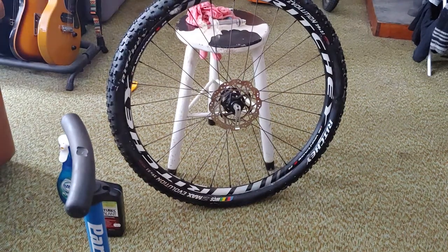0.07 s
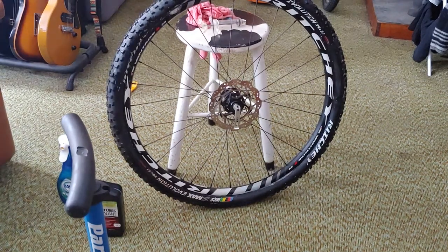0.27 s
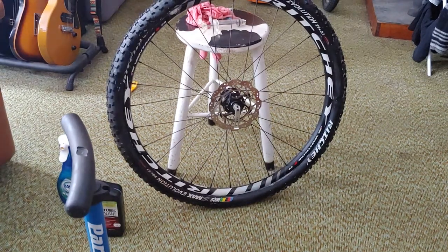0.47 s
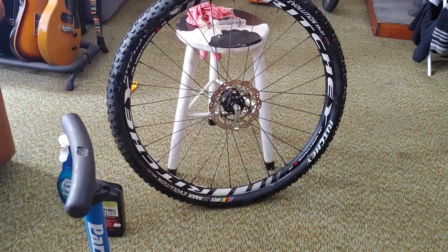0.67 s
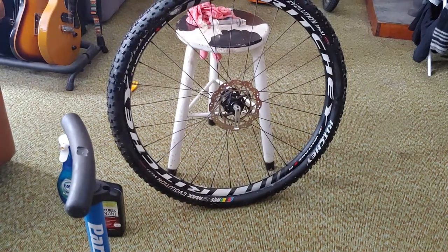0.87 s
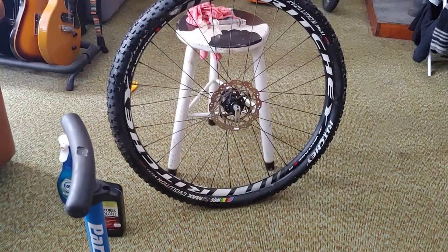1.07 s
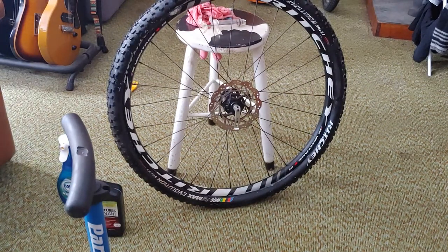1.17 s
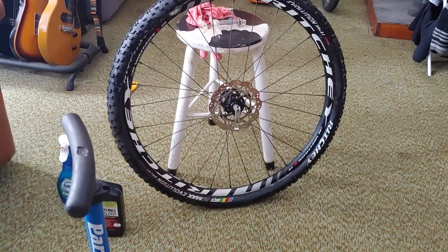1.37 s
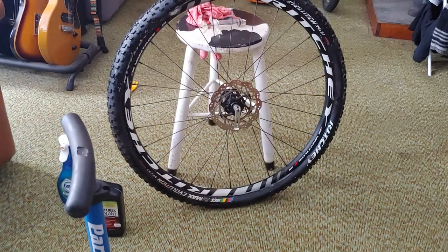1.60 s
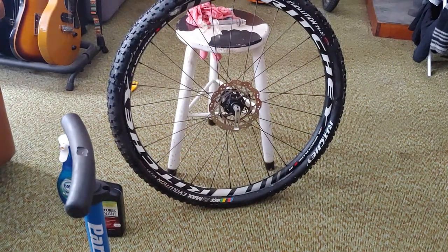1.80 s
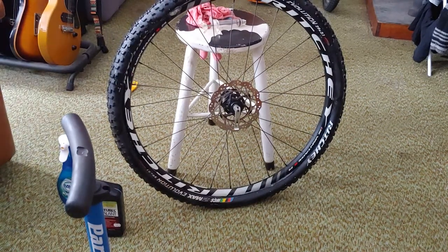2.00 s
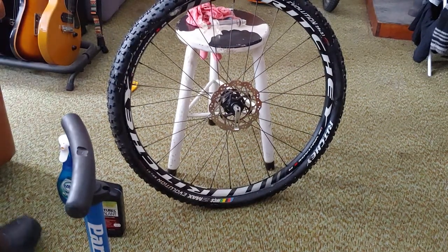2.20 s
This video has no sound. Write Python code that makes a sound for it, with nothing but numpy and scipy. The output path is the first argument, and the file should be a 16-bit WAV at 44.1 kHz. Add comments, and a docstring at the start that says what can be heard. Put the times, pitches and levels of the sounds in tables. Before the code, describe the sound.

Air hisses from a bicycle tyre and fades, with a sharp pop and a thud.

```python
"""From the start, air hisses out of a bicycle tyre in a small carpeted room, over a low hum and faint noise.
At 0.2 s the tyre gives a sharp pop, then a scuff of rubber and a duller thud at 0.4 s, probably
its bead (the stiff edge) leaving the rim. The hiss fades as the pressure drops, and a thin whistle
lingers. A soft knock follows at 1.7 s. Two microphones hear it all."""
import sys
import numpy as np
from scipy import signal
from scipy.fft import rfft, irfft
from scipy.io import wavfile
from scipy.ndimage import map_coordinates

SR = 44100
rng = np.random.default_rng(int(sys.argv[2]) if len(sys.argv) > 2 else 0)


def store_wav(level_fs):
    """Save 16-bit WAV to argv[1]."""
    pcm = np.round(np.clip(np.atleast_2d(level_fs), -1, 1) * 32767)
    wavfile.write(sys.argv[1], SR, pcm.T.astype(np.int16))


N = 99225

# Tone colour of the broad hiss and of the first low rush of air: f/Hz, relative level/dB
HISS_COLOUR = [(200, -12.5), (600, -4.5), (1500, -10), (2000, -4), (2500, -9), (3500, 1.5), (5000, -1.5),
               (6100, -4), (7500, 1), (8100, -6.5), (8650, -50), (9700, -7), (11000, -7), (12600, -17.5),
               (14000, -8), (14900, -20)]
RUSH_COLOUR = [(100, -5), (230, -2), (400, 0.5), (680, 0.5), (1200, -4.5), (2000, -12), (4000, -32)]
# Pitches at which the jet of air rings: f/Hz, width/Hz, relative level/dB
LOWER_PEAKS = [(3655, 290, -0.5), (3900, 160, -2), (4040, 120, -0.5), (4230, 190, -2.5), (4440, 110, -3.5)]
UPPER_PEAKS = [(6530, 90, -12), (6816, 82, 2.5), (6890, 100, 2), (7082, 140, -1.5), (7150, 94, -9.5),
               (7480, 270, -11.5)]
WHISTLE_PEAK = [(4051, 70, 0)]
# Fading as the tyre empties: t/s, hiss level/dB, lower peaks level/dB, upper peaks level/dB
AIR_LEVELS = [(0, -43.5, -47.5, -42.5), (.2, -46, -48.5, -43), (.5, -51.5, -51.5, -47.5),
              (.78, -54.5, -50, -51), (1.15, -58, -56.5, -52), (1.42, -62, -58, -55.5),
              (1.56, -63, -63.5, -58), (2.0, -69.5, -67, -64), (2.25, -70.5, -70.5, -66.5)]

def escaping_air():
    """A jet of air hisses and half whistles near 4 and 7 kHz; its low rush dies first."""
    t = clock()
    times, *levels = np.array(AIR_LEVELS).T
    hiss_gain, lower_gain, upper_gain = (undb(np.interp(t, times, db)) for db in levels)
    rush_db = -46.5 - 47 * np.maximum(t - 0.25, 0)  # holds for 0.25 s, then falls 47 dB a second
    rush = undb(rush_db) * noise(curve(RUSH_COLOUR))
    whistle = undb(-55 - 6.5 * t) * resonances(WHISTLE_PEAK)
    hiss = hiss_gain * noise(curve(HISS_COLOUR))
    ringing = lower_gain * resonances(LOWER_PEAKS) + upper_gain * resonances(UPPER_PEAKS)
    return hiss + ringing + whistle + rush


def resonances(peaks, drift=0.0022, drift_hz=7.14, flutter_db=0.9, flutter_hz=11):
    """Swirling air rings in narrow bands, which waver in pitch and loudness."""
    power = sum(undb(db) ** 2 / (1 + (2 * (bins() - hz) / width) ** 2) ** 2 for hz, width, db in peaks)
    position = np.arange(N) + np.cumsum(drift * wobble(drift_hz))  # uneven speed bends the pitch
    steady = noise(10 * np.log10(power))
    wavering = np.array([map_coordinates(side, [position], order=5, mode="mirror") for side in steady])
    return wavering * undb(flutter_db * wobble(flutter_hz))


# Notes of the tyre and rim after the pop: f/Hz, level/dB, time to fade by 60 dB/s
POP_NOTES = [(109, -24, 0.21), (189, -13.5, 0.13), (275.8, -21, 0.22), (385.2, -10, 0.12), (456, -4, 0.054),
             (519.6, -17.5, 0.216), (577, -21.5, 0.2), (652, -18.5, 0.066), (994, -20.5, 0.12),
             (1083, -18.5, 0.071), (1265, -21.5, .07), (1620, -30, 0.068), (2080, -29, 0.035)]
# Tone colour of the crack, its echo and the room's low ring: f/Hz, relative level/dB
CRACK_COLOUR = [(100, -40), (450, 0.5), (1000, -2.5), (2300, -12.5), (3300, -23), (5300, -16.5),
                (7000, -20), (8700, -35), (15000, -43)]
ECHO_COLOUR = [(70, -22), (150, -10), (400, 2), (600, -1), (900, -11), (1450, -10), (3200, -27),
               (6000, -30), (12000, -53)]
ROOM_RING_COLOUR = [(200, -28), (380, 8.5), (520, -10.5), (2000, -47)]

def pop(start_s=.2022):
    """A sharp crack sets the tyre and rim ringing, and the room answers."""
    wheel = ring(start_s, POP_NOTES, rise_cycles=.32, lag_s=.00009)
    echo = burst(start_s, ECHO_COLOUR, db=-23.5, rise_s=.008, hold_s=.008, fade_s=.26)
    room_ring = burst(start_s, ROOM_RING_COLOUR, db=-41, rise_s=.05, hold_s=.04, fade_s=1.13)
    crack = burst(start_s, CRACK_COLOUR, db=-13.5, rise_s=.0004, hold_s=.004, fade_s=.036)
    return crack + wheel + echo + room_ring


# Notes set off by the scuff and the thud: f/Hz, level/dB, time to fade by 60 dB/s
SCUFF_NOTES = [(407.6, -41.5, .4), (1400, -40, 0.29)]
THUD_NOTES = [(119, -30.5, 0.37), (179.5, -26.5, 0.15), (266.4, -31, 0.15), (346, -24, 0.21),
              (385, -30, 0.29), (499, -24.5, 0.18), (664, -16, 0.19), (712, -27, 0.13), (957, -23, 0.077),
              (1049, -26.5, 0.12), (1156, -24.5, 0.1), (1243, -22.5, 0.097), (1932, -19, 0.097)]
# Tone colour of their noise: f/Hz, relative level/dB
SCUFF_COLOUR = [(95, 5), (200, -9), (400, -1), (1100, -14), (1400, -0.5), (2500, -12), (3400, -5.5),
                (6000, -40)]
THUD_COLOUR = [(50, -13), (120, -9), (350, -4.5), (700, 1.5), (1200, 0), (1450, -16), (2000, -8),
               (2500, -19), (3100, -15.5), (5000, -31), (10000, -65)]

def thud(scuff_s=.291, blow_s=.3818):
    """Rubber scuffs briefly, then a softer-edged blow rings the wheel."""
    scuff = burst(scuff_s, SCUFF_COLOUR, db=-37.5, rise_s=.009, hold_s=.01, fade_s=.17)
    scuff_ring = ring(scuff_s, SCUFF_NOTES, rise_cycles=6.3, lag_s=.0001)
    wheel = ring(blow_s, THUD_NOTES, rise_cycles=6.3, lag_s=.00017)
    blow = burst(blow_s, THUD_COLOUR, db=-24.5, rise_s=.004, hold_s=.016, fade_s=.19)
    return scuff + scuff_ring + wheel + blow


# Notes of the knock: f/Hz, level/dB, time to fade by 60 dB/s
KNOCK_NOTES = [(181, -56, 0.19), (218, -43, 0.3), (276, -43.5, 0.16), (325, -37, 0.13), (655, -39.5, 0.08),
               (730, -43.5, 0.11), (860, -47, 0.09), (975, -51, 0.047)]
# Tone colour of its noise: f/Hz, relative level/dB
KNOCK_COLOUR = [(80, -3), (280, 5), (800, -1.5), (2500, -20), (3600, -18), (5000, -42), (12000, -62)]

def knock(start_s=1.7435):
    """A faint, dull knock: a few low notes and a puff of noise."""
    notes = ring(start_s, KNOCK_NOTES, rise_cycles=.28, lag_s=.0001)
    return notes + burst(start_s, KNOCK_COLOUR, db=-40.5, rise_s=.0005, hold_s=.006, fade_s=.15)


def ring(start_s, notes, rise_cycles, lag_s):
    """A struck object's notes swell, low ones slowest, then fade; the left side hears them lag_s late."""
    age = np.maximum(clock() - start_s - np.array([[lag_s], [0]]), 0)
    sound = 0
    for hz, db, fade_s in notes:
        swell = 1 - np.exp(-age * hz / rise_cycles)
        fade = undb(-60 * age / fade_s)
        sound = sound - undb(db) * swell * fade * np.sin(2 * np.pi * hz * age)
    return sound


def burst(start_s, colour, db, rise_s, hold_s, fade_s):
    """A puff of noise that rises, holds, then drops 60 dB every fade_s."""
    age = clock() - start_s
    rise = np.clip(age / rise_s, 0, 1)
    fade = undb(-60 * np.maximum(age - rise_s - hold_s, 0) / fade_s)
    return undb(db) * rise * fade * noise(curve(colour))


def add_echoes(sound, count=12, total_db=-12, lowest_hz=220):
    """Nearby walls and furniture send different quick echoes to each microphone."""
    delay_s = rng.uniform(.004, .03, (2, count))
    strength = rng.standard_normal((2, count))
    strength *= undb(total_db) / np.linalg.norm(strength, axis=1, keepdims=True)
    pattern = np.zeros((2, int(delay_s.max() * SR) + 1))
    pattern[np.arange(2)[:, None], (delay_s * SR).astype(int)] = strength
    echoes = signal.fftconvolve(sound, pattern, axes=1)[:, :N]
    return sound + cut_bass(echoes, lowest_hz)  # longer waves bend round the furniture


# Tone colour of the room's noise: f/Hz, relative level/dB
ROOM_COLOUR = [(20, -2.5), (50, 2.5), (72, -8), (90, 3), (135, -7), (205, 3.5), (350, -7.5), (540, -3.5),
               (800, -9), (1250, -9.5), (1500, -12.5), (2800, -19), (5000, -21), (8000, -45), (15000, -69)]

def room(noise_db=-53.5, hum_hz=59.2, hum_db=-49):
    """Faint, steady room noise and a low hum that wavers very slightly."""
    hum = np.sqrt(2) * np.sin(2 * np.pi * hum_hz * clock())
    return undb(noise_db) * noise(curve(ROOM_COLOUR)) + undb(hum_db + 0.21 * wobble(3)) * hum


# How alike the two microphones hear noise: f/Hz, likeness (1 same, 0 unrelated, -1 opposite)
LIKENESS = [(60, 0.7), (150, 1), (290, 0.87), (630, 0.75), (1370, 0.15), (3000, -0.03), (7000, -0.29),
            (14000, -0.3)]

def noise(colour_db):
    """Stereo noise of a given tone colour; left and right are alike in the bass, far less so higher up."""
    mid, side = rfft(rng.standard_normal((2, N)))
    alike = curve(LIKENESS)
    mid, side = mid * np.sqrt(1 + alike), side * np.sqrt(1 - alike)
    return unit(irfft(np.array([mid + side, mid - side]) * undb(colour_db), N))


def wobble(rate_hz):
    """A smooth random wobble, mostly slower than rate_hz, with a typical size of 1."""
    return unit(irfft(rfft(rng.standard_normal(N)) / (1 + (bins() / rate_hz) ** 2), N))


def cut_bass(sound, hz):
    """Turn down everything below hz."""
    return signal.sosfilt(signal.butter(2, hz, "highpass", fs=SR, output="sos"), sound)


def curve(points):
    """Join (frequency, value) points with straight lines along a pitch scale."""
    hz, value = np.array(points).T
    return np.interp(np.log(bins() + 1), np.log(hz), value)


def undb(db):
    """Turn decibels into a multiplier."""
    return 10 ** (np.asarray(db) / 20)


def unit(x):
    """Scale to a typical size (rms) of 1."""
    return x / np.sqrt(np.mean(x ** 2))


def clock():
    """Time of each sample."""
    return np.arange(N) / SR


def bins():
    """Frequency of each slice of the spectrum."""
    return np.arange(N // 2 + 1) * SR / N


def scene():
    """The tyre and the knock with their echoes, over the room's background."""
    return add_echoes(escaping_air() + pop() + thud() + knock()) + room()


# How much louder the left microphone is than the right: f/Hz, level/dB
BALANCE = [(60, 2.5), (300, -0.5), (700, 3), (1250, 2), (1800, -8.5), (2700, -1), (3700, -7), (5000, 0),
           (6100, -1), (6900, -14), (8000, -10), (9800, 1), (11400, 5.5), (14000, -2)]

def record(dry, rumble_hz=28, top_hz=14900):
    """Each microphone colours the sound; rumble is cut, peaks are rounded and the highest treble goes."""
    balance = undb(curve(BALANCE) * np.array([[1], [-1]]) / 2)
    balance /= np.sqrt(np.mean(balance ** 2, axis=0))
    heard = cut_bass(irfft(rfft(dry) * balance, N), rumble_hz)
    rounded = heard / (1 + heard ** 6) ** (1 / 6)
    return signal.sosfilt(signal.ellip(10, .2, 80, top_hz, fs=SR, output="sos"), rounded)


dry = scene()
out = record(dry)
store_wav(out)
```